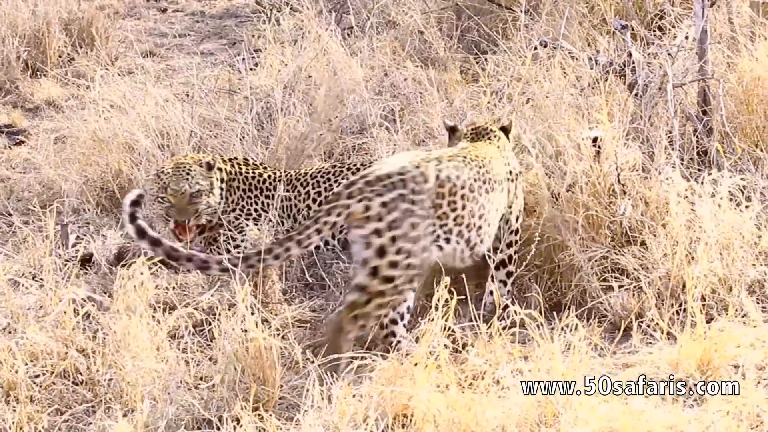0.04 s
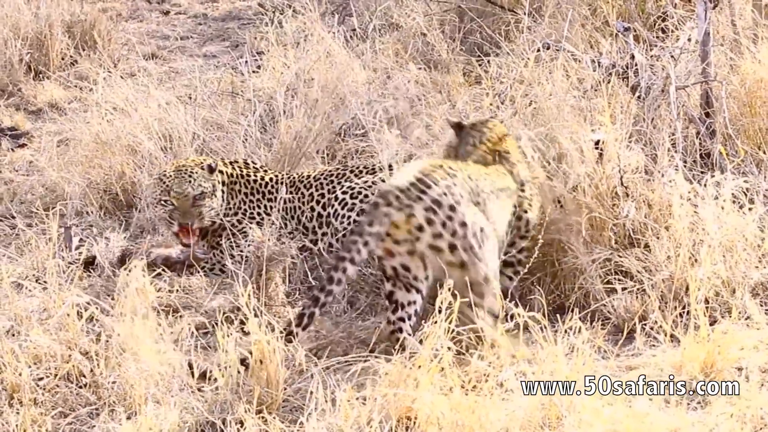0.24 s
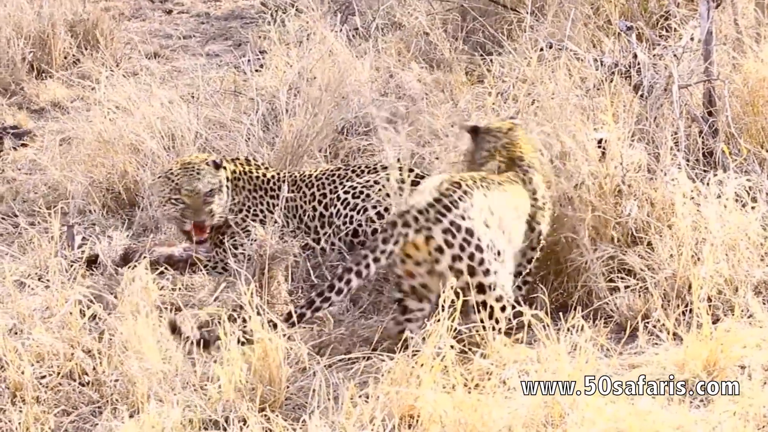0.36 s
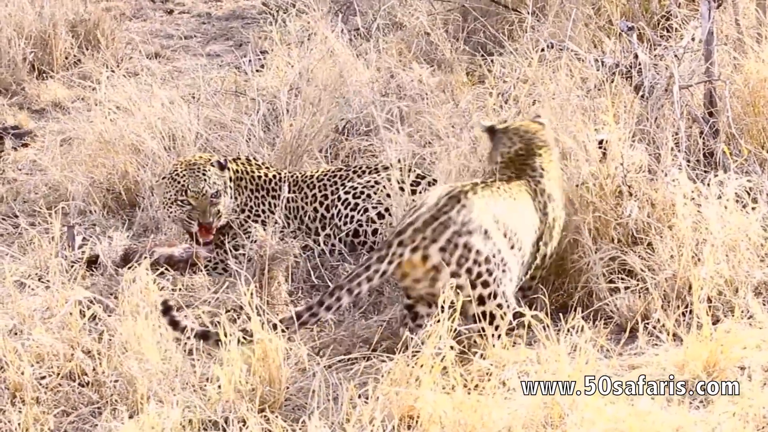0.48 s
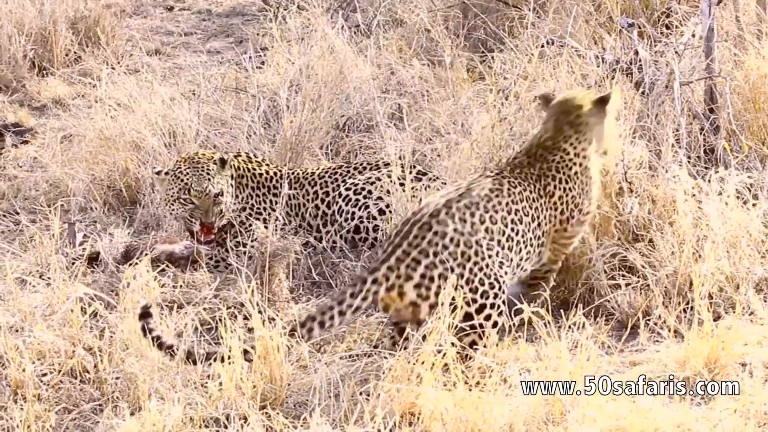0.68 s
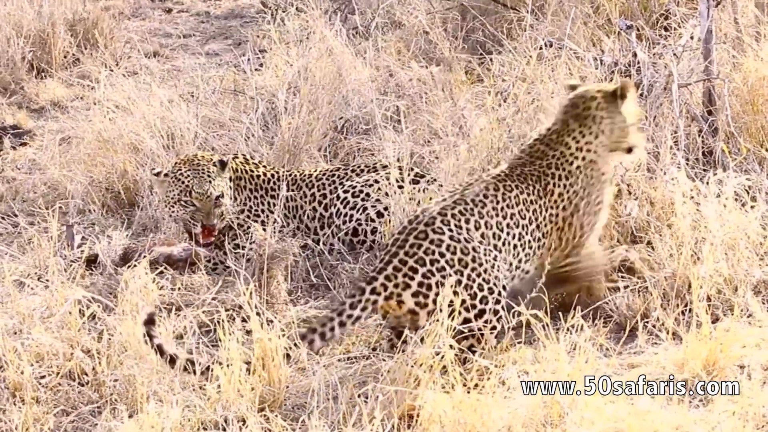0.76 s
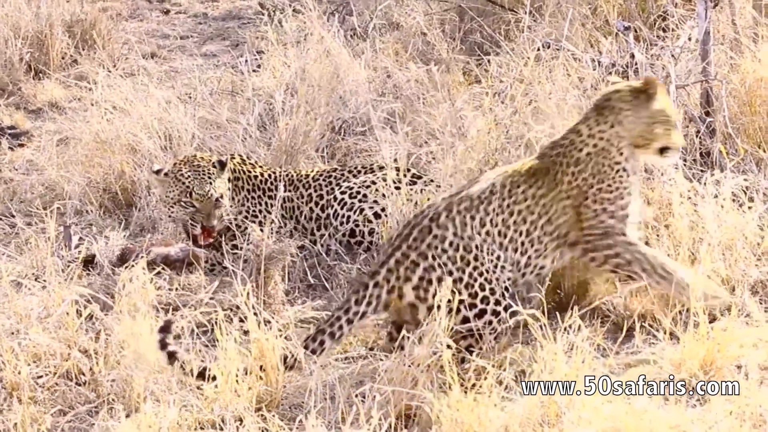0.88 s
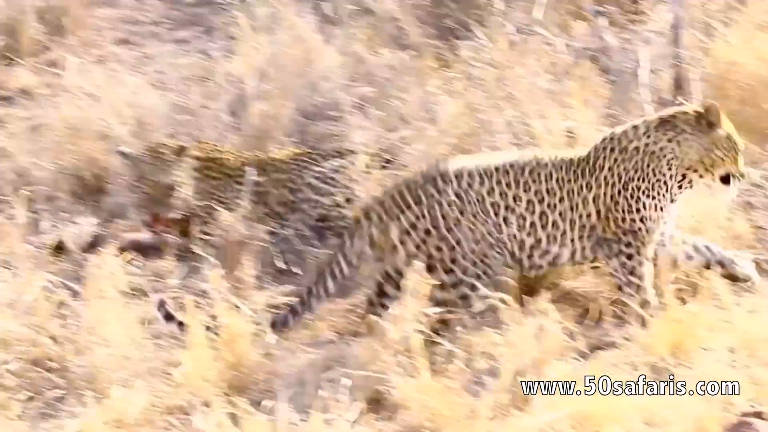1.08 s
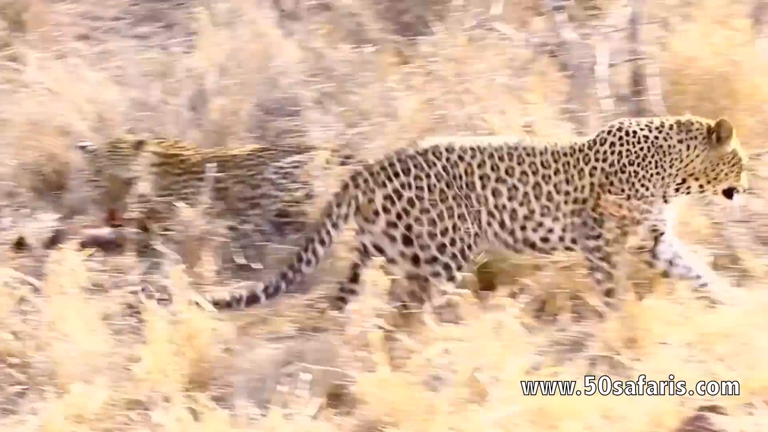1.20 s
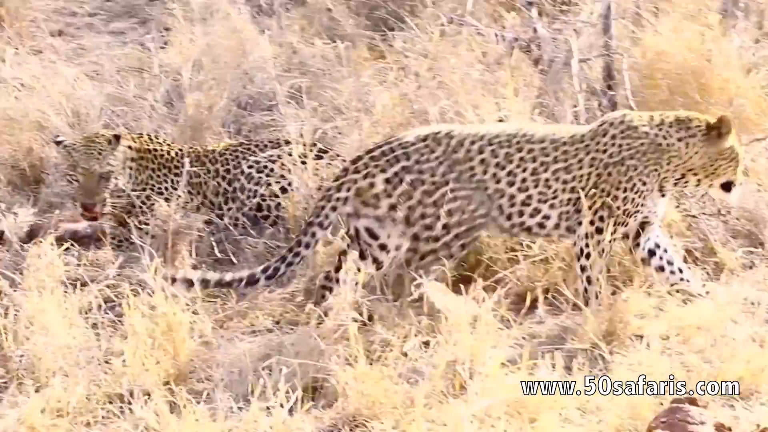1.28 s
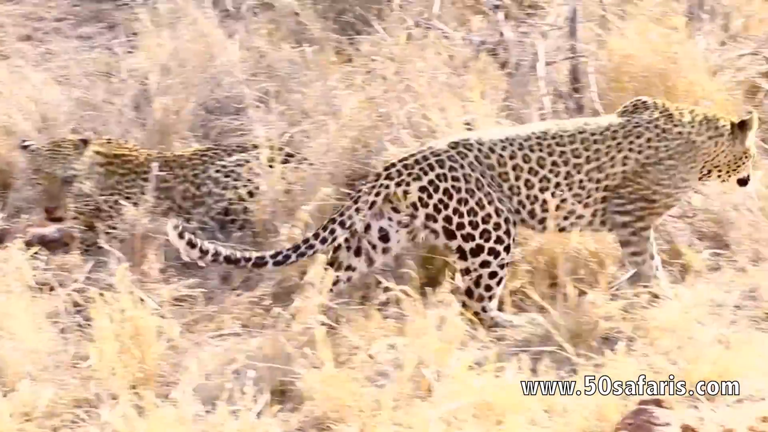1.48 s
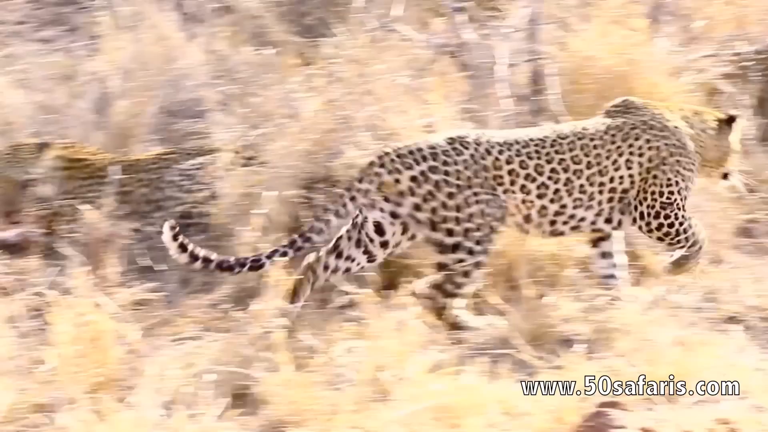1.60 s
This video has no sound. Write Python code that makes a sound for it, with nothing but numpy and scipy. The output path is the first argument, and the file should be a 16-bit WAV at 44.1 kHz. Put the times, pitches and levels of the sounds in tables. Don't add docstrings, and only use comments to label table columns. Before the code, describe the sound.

A big cat growls low and rough up close while dry grass rustles and snaps outdoors

```python
import sys
import numpy as np
from scipy import signal
from scipy.io import wavfile

SR = 44100
rng = np.random.default_rng(int(sys.argv[2]) if len(sys.argv) > 2 else 0)


def master(y):
    cut = np.clip(np.atleast_2d(y).T, -1, 1)
    pcm = np.round(cut * 32767)
    wavfile.write(sys.argv[1], SR, pcm.astype(np.int16))


def gain_from_db(level_db):
    decades = np.asarray(level_db, float) / 20
    return 10 ** decades


N = 72765
T = np.arange(N) / SR

# f/Hz, level/dB
AIR_COLOUR = [(40, -3), (200, 1.5), (330, -4), (600, -11.5), (1000, -15), (2500, -27.5), (9000, -23.5),
              (15700, -34)]
# t/s, level/dB, coarse stalk share/dB
GRASS_MOVES = [(0, -54, 5.5), (.05, -47.5, -1.5), (0.137, -51.5, 4.5), (0.174, -40.5, 1), (.23, -39.5, -2),
               (0.381, -44.5, 4), (.42, -49, -11), (.46, -47, 0), (.505, -45, 8.5), (.55, -46.5, -9),
               (.66, -45, -6), (.8, -44, -4), (.96, -44.5, -1), (1.1, -46.5, 0), (1.22, -50, -2),
               (1.364, -45, 3), (1.383, -62.5, 9.5), (1.65, -58.5, -3)]
# f/Hz, level/dB
BLADE_COLOUR = [(300, -6.5), (800, -10.5), (1500, -5), (3000, -10), (5000, -10), (8000, -11), (11500, -6),
                (15700, -22.5)]
# f/Hz, width/Hz, level/dB
STALK_RESONANCES = [(1654, 940, 13), (2297, 1100, 19.5), (2940, 820, 10.5)]
# first flap t/s, last flap t/s
FLAP_STRETCHES = [(.0446, .126), (.16, .2076), (.243, .317), (.36, .361), (.446, .48), (.5248, .7252),
                  (.7667, .8062), (.8545, .9008), (.9456, 1.09), (1.135, 1.227), (1.153, 1.154),
                  (1.262, 1.2767), (1.302, 1.3214), (1.341, 1.342), (1.388, 1.442), (1.467, 1.5225),
                  (1.568, 1.6184)]
FLAP_COUNTS = [3, 2, 3, 1, 2, 6, 2, 2, 4, 3, 1, 2, 2, 1, 2, 2, 2]
# t/s, effort level/dB, throat f/Hz, throat ring/ms, chest share/dB
VOICE_BREATHS = [
    [(.045, -31, 181, 18, -7.5), (.126, -34.5, 188, 19, -13), (.16, -27.5, 197, 18, 1.5),
     (.21, -22.5, 210, 12.2, -13), (.24, -26, 206, 22, -5), (.28, -24.5, 169, 18.6, -7),
     (.317, -27, 158, 13, -5.5), (.36, -28, 176, 11, -10)],
    [(.446, -24.5, 191, 18.6, -13), (.48, -28, 200.6, 23, -10), (.525, -18.5, 216, 5.4, -14),
     (.565, -20, 176, 16, -11), (.605, -12, 199, 11, -19), (.645, -16, 208, 13.4, -10),
     (.725, -12, 211, 9.5, -17), (.767, -14.5, 240.7, 12.7, -11.5), (.806, -16, 213, 21.6, -15)],
    [(.855, -18.5, 189.4, 19.3, -23), (.9, -16, 183, 25.5, -17), (1.04, -17, 185.5, 18.6, -15.5),
     (1.09, -19, 179.7, 13.6, -12.5), (1.135, -23, 188, 8.1, -4), (1.153, -30, 166, 12.5, -15),
     (1.18, -25.5, 173, 18, 2), (1.227, -26.5, 165, 11, -4)],
    [(1.262, -35, 148, 11, -0.5), (1.277, -22, 158, 20, -14), (1.302, -32.5, 145, 9.1, -0.5),
     (1.32, -22.5, 163, 15, -9), (1.34, -40.5, 148, 15, 7), (1.388, -36.5, 173, 30, -21),
     (1.442, -34.5, 165.7, 31, -36), (1.522, -35, 171.4, 27, -24), (1.568, -37, 159, 19, -7),
     (1.62, -35.5, 175, 13, -20)],
]
# f/Hz, level/dB, ring/ms
UPPER_THROAT = [(375, -22, 14), (605, -21, 10)]
# centre t/s, level/dB, f/Hz
BLADE_FLICKS = [(.175, -46, 1636), (.179, -44, 2153), (.19, -43, 2928), (.191, -42, 2497), (.2, -44, 1550),
                (.202, -44, 2756), (.203, -42, 2153), (.217, -43, 2325), (.219, -44, 1550),
                (.229, -44, 1550), (.235, -43, 2325), (.239, -44, 1894), (.245, -43, 2325),
                (.268, -42, 1894), (.271, -43, 2583), (.279, -43, 2497), (.295, -43, 2497),
                (.303, -46, 3186), (.306, -45, 2756), (.319, -41, 1620), (.345, -46, 1981),
                (.361, -45, 2497), (.374, -46, 1894), (.377, -45, 3100), (.468, -46, 1722),
                (.489, -44, 1636), (.493, -44, 3703), (.507, -42, 1722), (.533, -43, 1550),
                (.638, -43, 2325), (.654, -42, 2153), (.666, -46, 1291), (.678, -46, 1378),
                (.681, -43, 2300), (.687, -44, 1722), (.702, -46, 2153), (.727, -48, 1722),
                (.783, -48, 1378), (.798, -45, 2153), (.807, -44, 1464), (.863, -42, 1378),
                (.866, -42, 2239), (.886, -48, 2239), (.906, -45, 1378), (1.067, -48, 2411),
                (1.255, -48, 947), (1.307, -43, 2497), (1.345, -46, 2411), (1.363, -47, 2411)]
# t/s, peak level/dB, f/Hz, ring/ms
STALK_SNAPS = [(.283, -37, 1620, 12), (.325, -37, 1650, 14), (.38, -38, 3100, 8), (.447, -43, 610, 10),
               (.495, -28, 3180, 10), (.405, -38, 335, 16), (.529, -36, 340, 18), (.548, -40, 340, 12),
               (1.336, -37, 440, 12), (.565, -34, 615, 12), (.637, -30, 1320, 10), (.765, -36, 920, 9),
               (.7655, -39, 1220, 8)]
# t/s, length/s, level/dB, f/Hz,
# width/Hz
TUSSOCK_BRUSHES = [(.45, .1, -54, 1650, 350), (.47, .05, -52, 350, 70), (.485, .04, -50, 3200, 500),
                   (.5, .03, -50, 6500, 1200), (.64, .1, -55, 1350, 300), (.77, .15, -55, 1400, 400),
                   (.635, .12, -54, 2200, 600), (.62, .2, -55, 11000, 3500), (.97, .12, -54, 11300, 3000),
                   (1.1, .16, -59, 600, 400), (1.25, .128, -54, 480, 200), (1.29, .088, -54, 2250, 900)]
# t/s, peak level/dB, centre f/Hz, length/ms
DRY_CRACKS = [(0.854, -29, 2360, 2.2), (0.933, -31.5, 6300, 5.3), (0.941, -26, 4300, 3.3),
              (0.956, -25, 3450, 1.5), (1.036, -28, 5400, 2.6), (1.089, -30, 3580, 4.3),
              (.657, -39, 9000, 4.5), (1.147, -35, 5300, 1.4)]
# t/s, length/s, f/Hz, level/dB
BIRD_WHISTLES = [(1.29, .03, 3760, -61), (1.318, .048, 3760, -54), (1.378, .025, 3720, -63),
                 (1.385, .03, 2020, -66), (1.405, .046, 3750, -59), (1.478, .04, 2020, -64),
                 (1.49, .022, 3750, -66)]
# t/s, level/dB
SLIDING_WHISTLES = [(1.363, -57), (1.447, -60)]
CHIRP_TIMES = [1.352, 1.432]


def rms_one(x):
    return x / np.sqrt(np.mean(x ** 2) + 1e-20)


def drift(rate):
    r = np.exp(-80 * np.pi * rate / SR)
    white = rng.standard_normal(N // 40 + 2002)
    slow = signal.lfilter([1], [1, -2 * r, r * r], white)[2000:]
    return np.interp(np.arange(N) / 40, np.arange(len(slow)), rms_one(slow))


def resonate(x, hz, width_hz):
    r = np.exp(-np.pi * width_hz / SR)
    poles = [1, -2 * r * np.cos(2 * np.pi * hz / SR), r * r]
    return signal.lfilter([(1 - r * r) / 2, 0, (r * r - 1) / 2], poles, x)


def coloured(white, spectrum, patchy_db):
    hz, db = np.transpose(spectrum)
    edges = 22 * 2 ** np.arange(1, 9.7, 1 / 3)
    out = 0
    for k, (low, high) in enumerate(zip(edges, edges[1:])):
        sos = signal.butter(2, [low, high], "band", fs=SR, output="sos")
        band = signal.sosfilt(sos, white[k % 2])
        level_db = np.interp(np.log(low * high) / 2, np.log(hz), db)
        out = out + band * gain_from_db(level_db + patchy_db * drift(8))
    return rms_one(out)


def add(out, s, sound):
    i = int(s * SR)
    out[i:i + len(sound)] += sound[:N - i]


def open_air():
    return gain_from_db(-54.5) * coloured(rng.standard_normal((2, N)), AIR_COLOUR, patchy_db=2.5)


def grass(move_db, coarse_db):
    grains_per_s, grain_spread_db, stalk_db = 5000, 0, -5.5
    sizes = gain_from_db(grain_spread_db * np.minimum(rng.exponential(1, (3, N)), 5))
    signs = rng.choice([-1, 1], (3, N))
    struck = rng.random((3, N)) < grains_per_s * gain_from_db(drift(40)) / SR
    grains = sizes * signs * struck + 1e-18
    stalks = 0
    for hz, width, db in STALK_RESONANCES:
        flicker = gain_from_db(db + 2 * drift(40))
        stalks = stalks + flicker * rms_one(resonate(resonate(grains[2], hz, width), hz, width))
    blades = coloured(grains, BLADE_COLOUR, patchy_db=.5)
    return gain_from_db(move_db) * (blades + gain_from_db(stalk_db + coarse_db) * rms_one(stalks))


def rasp(move_db):
    hz, width_hz, level_db, follows_grass = 175, 124, -37.5, 1.14
    noise = resonate(rng.standard_normal(N), hz, width_hz)
    noise = resonate(noise, hz * .8, width_hz * 2)
    effort_db = follows_grass * (move_db - move_db.max())
    return rms_one(noise) * gain_from_db(level_db + effort_db + 2 * drift(16))


def throat_modes(at, hz, ring_ms, chest_db):
    open_s, width_s, shut_db, rise_hz_per_s = .6, .16, -15, 400
    mouth_db = shut_db * min(1, ((at - open_s) / width_s) ** 4)
    rise_hz = rise_hz_per_s * np.clip(at - open_s, 0, width_s)
    top_hz, top_db, top_ms = UPPER_THROAT[1]
    return [(hz, 0, ring_ms),
            (hz * .88, -15, 30),
            (102, chest_db, 18),
            UPPER_THROAT[0],
            (top_hz + rise_hz, top_db + mouth_db, top_ms)]


def growl():
    out, t = np.zeros(N), np.arange(int(.09 * SR)) / SR
    pitch_spread = np.array([[0], [.03], [.03], [.03], [.03]])
    spread_db = np.array([[.7], [.9], [.9], [.9], [.9]])
    bend_per_s = np.array([[1.2], [0], [0], [0], [0]])
    lag_s = np.array([[0], [0], [.0031], [0], [0]])
    polarity = np.array([[-1], [-1], [1], [-1], [-1]])
    attack = 1 - np.exp(-1000 * t / 2.1)
    stretches = [np.linspace(a, b, n) for (a, b), n in zip(FLAP_STRETCHES, FLAP_COUNTS)]
    s, *columns = np.concatenate(VOICE_BREATHS).T
    for at in np.concatenate(stretches):
        effort_db, hz, ring_ms, chest_db = [np.interp(at, s, c) for c in columns]
        modes = throat_modes(at, hz, ring_ms, chest_db)
        f, level, ms = np.transpose(modes)[:, :, None]
        z = rng.standard_normal((3, 5, 1))
        f = f * (1 + pitch_spread * z[0])
        ms = ms * np.exp(.08 * z[1])
        fade = np.exp(-(1000 * t / ms) ** 1.3)
        tones = np.sin(2 * np.pi * f * (t * (1 + bend_per_s * t) - lag_s))
        flap = (polarity * gain_from_db(level + spread_db * z[2]) * fade * tones).sum(0)
        add(out, at - .0006, gain_from_db(effort_db) * flap * attack)
    return out - resonate(out, 345, 170)


def flicks():
    out, u = np.zeros(N), np.arange(SR // 50) / SR - .01
    swell = np.exp(-(1000 * u / 4.5) ** 2)
    for s, db, hz in BLADE_FLICKS:
        phase, bend = rng.uniform(-1.13, 1, 2)
        tone = np.sin(2 * np.pi * hz * u * (1 + 4 * bend * u) + np.pi * phase)
        add(out, s - .01, gain_from_db(db + 1.5) * swell * tone)
    return out


def snaps():
    out, t = np.zeros(N), np.arange(int(.056 * SR)) / SR
    attack = np.minimum(1, t / .0019)
    for s, db, hz, ms in STALK_SNAPS:
        noise = resonate(rng.standard_normal(len(t)), hz, hz * .25)
        tone = np.sin(2 * np.pi * hz * t) + .4 * rms_one(noise)
        add(out, s, gain_from_db(db) * tone * np.exp(-1000 * t / ms * 1.37) * attack)
    return out


def brushes():
    out = np.zeros(N)
    for s, length, db, hz, width in TUSSOCK_BRUSHES:
        n = int(length * SR)
        draw = rng.random((2, SR // 4))
        grains = (draw[0] < .08) * (draw[1] - .5) ** 3
        ring = resonate(resonate(grains, hz, width), hz, width)[2000:2000 + n]
        swell = np.sin(np.linspace(0, np.pi, n)) ** .4
        add(out, s, gain_from_db(db + 3.5) * rms_one(ring) * swell)
    return out


def cracks():
    out, t = np.zeros(N), np.arange(int(.056 * SR)) / SR
    attack = np.minimum(1, t / .0003)
    for s, db, hz, ms in DRY_CRACKS:
        burst = rms_one(resonate(rng.standard_normal(len(t)), hz, hz * 1.9))
        add(out, s, gain_from_db(db - 3) * burst * np.exp(-(1000 * t / ms) ** 2) * attack)
    return out


def note(hz, overtone=0):
    phase, u = 2 * np.pi * np.cumsum(hz) / SR, np.linspace(0, 1, len(hz))
    edge = np.sin(np.pi * u) ** .6 * np.sqrt(2) * gain_from_db(.8 * drift(80)[:len(hz)])
    octave = overtone * np.clip(4 * u - 1.3, 0, 1) * np.sin(2 * phase)
    return (np.sin(phase) + octave) * edge


def chirps():
    out, hold = np.zeros(N), .38
    u = np.linspace(0, 1, int(.057 * SR))
    hz = 3200 - 900 * np.clip((u - hold) / (1 - hold), 0, 1) ** 1.2
    for s in CHIRP_TIMES:
        add(out, s, gain_from_db(-54.5) * note(hz, overtone=gain_from_db(-6)))
    return out


def whistles():
    out = np.zeros(N)
    for s, length, hz, db in BIRD_WHISTLES:
        waver = 1 + .0052 * drift(60)[:int(length * SR)]
        add(out, s, gain_from_db(db) * note(hz * waver))
    for s, db in SLIDING_WHISTLES:
        add(out, s, gain_from_db(db) * note(np.linspace(3720, 3150, int(.016 * SR))))
    return out


def birds():
    return chirps() + whistles()


def scene():
    s, move, coarse = np.transpose(GRASS_MOVES)
    move_db, coarse_db = np.interp(T, s, move), np.interp(T, s, coarse)
    air = open_air()
    cat = growl() + rasp(move_db)
    stalks = grass(move_db, coarse_db) + brushes() + snaps() + flicks() + cracks()
    return (air + cat + stalks + birds())[None]


def band_limit(x):
    return signal.sosfilt(signal.butter(12, 15730, fs=SR, output="sos"), x)


def record(dry):
    bass_cut = signal.butter(2, 50, "high", fs=SR, output="sos")
    top_cut = signal.ellip(12, .5, 60, 15650, fs=SR, output="sos")
    mix = signal.sosfilt(top_cut, signal.sosfilt(bass_cut, dry))
    return band_limit(mix)


dry = scene()
out = record(dry)
master(out)
```